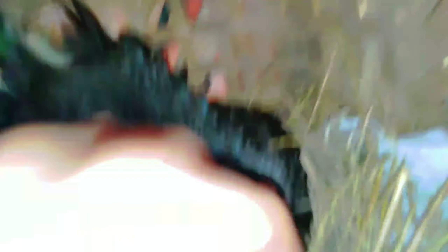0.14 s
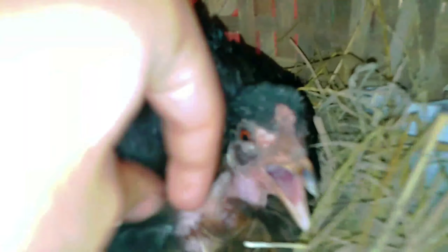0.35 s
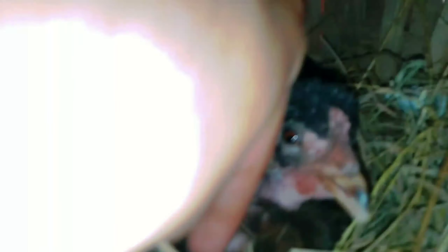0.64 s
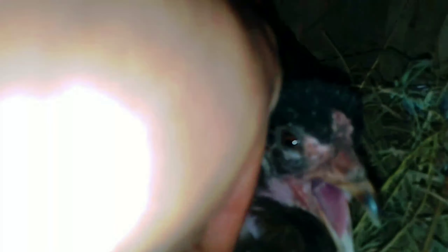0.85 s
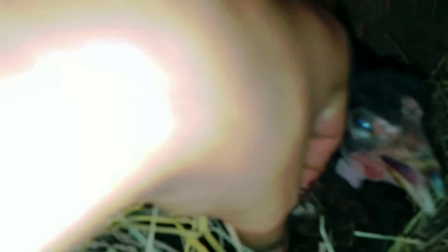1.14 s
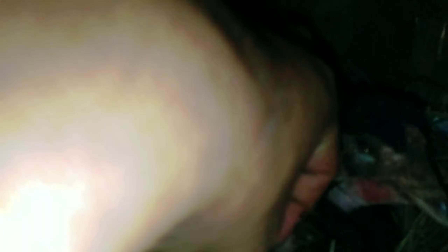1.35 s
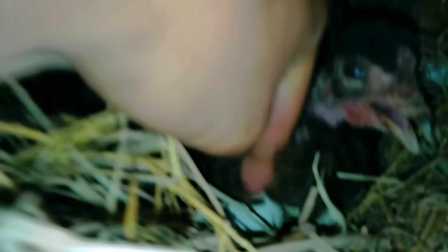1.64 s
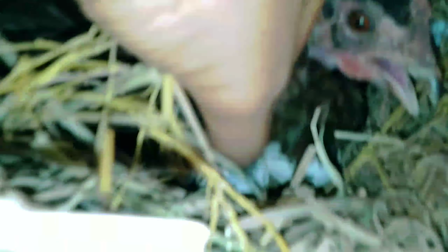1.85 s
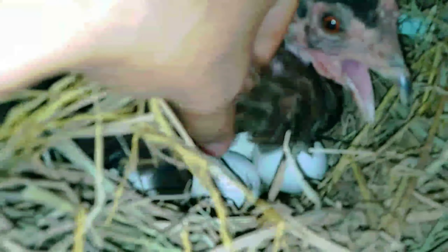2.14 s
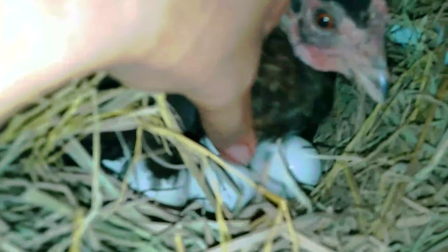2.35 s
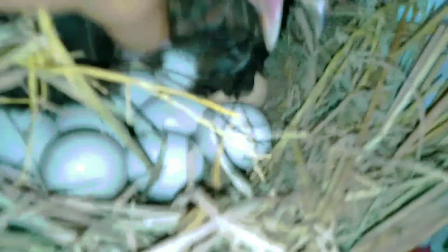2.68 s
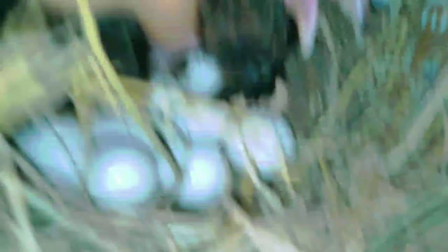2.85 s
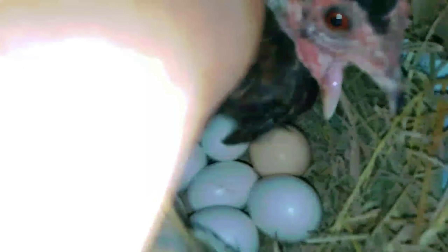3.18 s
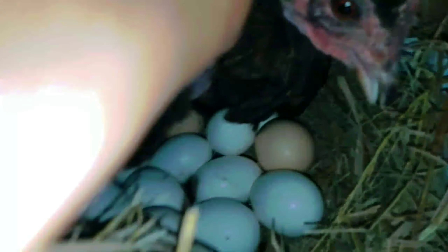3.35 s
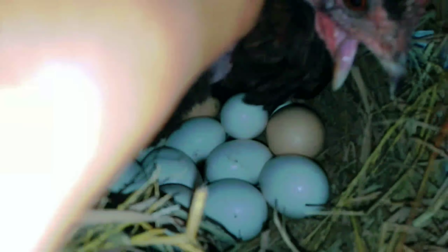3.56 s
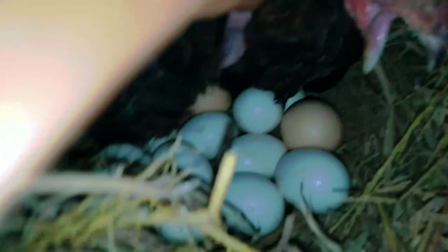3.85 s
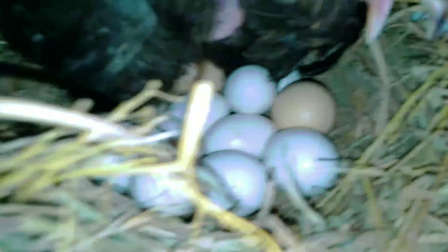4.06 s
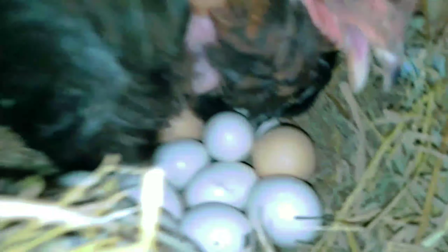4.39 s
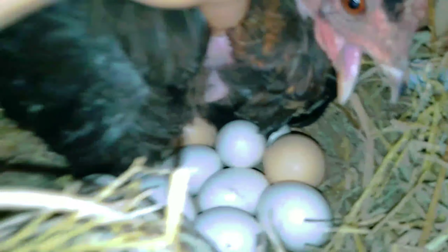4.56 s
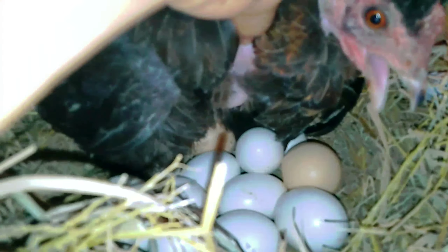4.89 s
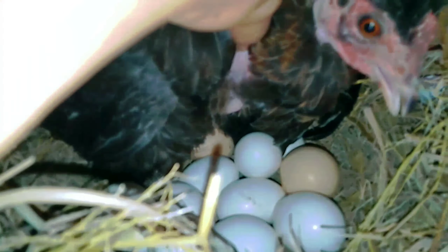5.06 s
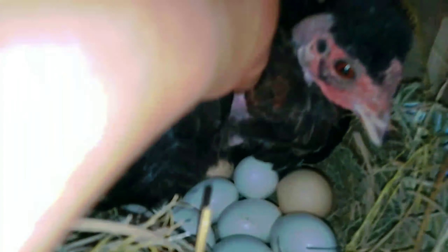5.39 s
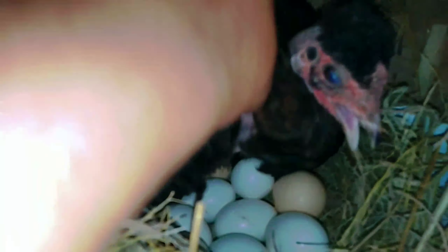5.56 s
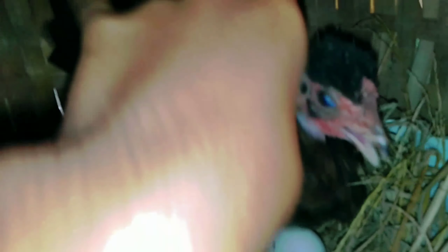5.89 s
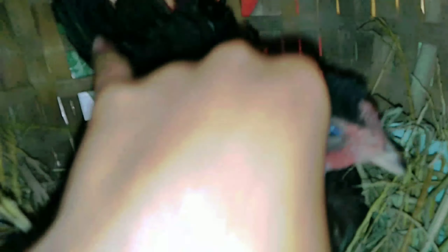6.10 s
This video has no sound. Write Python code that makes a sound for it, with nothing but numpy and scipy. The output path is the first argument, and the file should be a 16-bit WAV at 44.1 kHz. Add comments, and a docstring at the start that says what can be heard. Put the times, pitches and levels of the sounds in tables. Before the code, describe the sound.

Very close to the microphone, a brooding hen gives nine drawn-out squawks over about six seconds, breaking between nasal clear tone, flutter and harsh rasp. Tiny clucks fill some gaps. Faint chicks peep farther off in the first half, and two dry straw ticks snap. Behind lie a soft outdoor wash, low rumble and a short small-coop echo.

```python
"""A brooding hen protests, close to the microphone, as a hand lifts her off her eggs in a straw nest.
Membrane pulses and air pass through throat and beak resonances as clean tone, flutter and harsh rasp.
Chicks farther off in the yard peep as falling whistles; straw ticks are short decaying noise snaps.
The yard is coloured noise over a low rumble, and the small coop adds a short echo."""
import sys
import numpy as np
from scipy import signal
from scipy.fft import rfft, irfft
from scipy.io import wavfile
from scipy.ndimage import uniform_filter1d

SR = 44100
rng = np.random.default_rng(int(sys.argv[2]) if len(sys.argv) > 2 else 0)


def generate_wav(sig):
    """Save sig (samples, or channels by samples) to the path in sys.argv[1] as 16-bit PCM at SR."""
    pcm = np.round(np.clip(np.atleast_2d(sig).T, -1, 1) * 32767).astype(np.int16)
    wavfile.write(sys.argv[1], SR, pcm)


N = 274743

# the hen's long calls: start_s, end_s, first_beak_hz, last_beak_hz, upper_throat_hz,
# closing_pitch_fall (share), hiss_db, sizzle_db (above about 10 kHz)
LONG_CALLS = [(0.232, 0.6, 1980, 1880, 3560, 0.33, -1.5, -14),
              (0.771, 1.306, 1980, 1810, 3440, 0.21, -5, -14),
              (1.621, 2.358, 2052, 1947, 3023, 0.3, -4.5, -5.5),
              (2.719, 3.391, 2046, 1898, 3472, 0.27, -10, -0.5),
              (3.749, 3.915, 1560, 1524, 3430, 0.0076, -12, -8),
              (3.9, 4.21, 2190, 1940, 3457, 0.29, -3.5, 4),
              (4.267, 4.678, 1950, 2011, 3464, 0.042, 4.5, -2),
              (4.665, 5.505, 2053, 2051, 3647, 0.16, 1.5, 1.5), (5.492, 6.25, 1915, 1712, 3287, 0, -1, -5)]
# short clucks: centre_s, half_length_s, pitch_hz, roughness (0-1), level_db, brightness_db
SHORT_CLUCKS = [(0.044, .014, 345, 0.2, -34.5, -27), (0.193, 0.026, 438, 0.52, -30, -9),
                (2.657, .022, 505.4, 0.89, -28.5, -1.5), (3.551, .022, 441.4, .55, -30.5, -13.5),
                (3.641, 0.014, 534.4, 0.81, -28, -2)]
# harsh barks within a call, each a sudden shove of air:
# centre_s, half_length_s, level_db, upper_throat_db and hiss_db (both against that level)
AIR_SHOVES = [(0.398, 0.017, -43.5, 16.5, -14), (0.84, 0.013, -33.5, 1, -0.5),
              (1.051, .022, -22.5, 0.5, -14), (2.275, 0.0296, -39, 5, -24), (3.351, 0.01322, -26, 0.5, -27),
              (4.513, 0.0086, -37.5, 0.5, 1), (4.739, 0.0097, -22.5, -15, -6), (5.866, .022, -43.5, 9, 16)]
# treble as she turns her head to and from the microphone: time_s, level_db
HEAD_AIM = [(.45, -11.5), (.9, -11.5), (1.2, -11.5), (1.8, -8.5), (2.3, -16), (2.95, -21), (3.2, -1.5),
            (3.34, -3), (3.93, -1), (4.2, -8.5), (4.4, -23), (4.68, 1.5), (4.95, -1.5), (5.15, -17),
            (5.42, -16), (5.55, -5), (5.82, -7), (6.2, -22.5)]


def amp(db):
    """Decibels to a linear gain."""
    return 10 ** (np.asarray(db) / 20)


def unit(x):
    """Scales a sound to an RMS level of 1."""
    return x / np.sqrt(np.mean(x ** 2) + 1e-20)


def clock():
    """The time of every sample, in seconds."""
    return np.arange(N) / SR


def read(points, hz):
    """Reads a (Hz, value) table at any frequency, along a log frequency axis."""
    f, value = np.transpose(points)
    return np.interp(np.log(hz + 1), np.log(f + 1), value)


def follow(rows, t):
    """The columns of a table (s, ..) as curves over the times t."""
    s, *columns = np.transpose(rows)
    return [np.interp(t, s, c) for c in columns]


def colour(x, points):
    """Filters a sound by the response (Hz, dB)."""
    gain = amp(read(points, np.fft.rfftfreq(N, 1 / SR)))
    return irfft(rfft(x) * gain, N)


def wander(top_hz):
    """Random drift of RMS size 1, falling away steeply above top_hz."""
    hz = np.fft.rfftfreq(N, 1 / SR)
    spectrum = rfft(rng.standard_normal(N)) / np.sqrt(1 + (hz / top_hz) ** 4)
    return unit(irfft(spectrum, N))


def spell(start, end, fade):
    """1 between two times, with short ramps."""
    t = clock()
    return np.clip(np.minimum(t - start, end - t) / fade, 0, 1)


def bump(s, half, order=2):
    """A smooth swell of height 1 around the time s; a higher order gives steeper flanks."""
    return np.exp(-np.minimum(abs((clock() - s) / half) ** order, 50))


def steady(x, size=500):
    """Holds the short-time level at 1, keeping the fast grain."""
    power = uniform_filter1d(uniform_filter1d(x ** 2, size), size)
    return x / np.sqrt(abs(power) + 1e-12)


def add(mix, s, sound):
    """Lays a sound into the mix at the time s."""
    part = mix[round(s * SR):][:len(sound)]
    part += sound[:len(part)]


def resonate(x, hz, width):
    """A steep resonance of gain 1 that can follow a curve."""
    turn = np.exp(2j * np.pi * np.cumsum(hz * np.ones(N)) / SR)
    r = np.exp(-np.pi * width / SR)
    # shift the resonance down to 0 Hz, low-pass there, shift back
    smooth = signal.lfilter([(1 - r) ** 2], [1, -2 * r, r * r], x / turn + 1e-18)
    return 2 * (turn * smooth).real


def cavity(x, modes):
    """Several resonances side by side."""
    return sum(amp(db) * resonate(x, hz, width) for hz, width, db in modes)


def yard(rumble_swell_db=2):
    """A soft outdoor wash over a low, uneven rumble, both of coloured noise."""
    # colour of the wash: frequency_hz, relative_density_db
    wash_spectrum = [(180, -45), (300, -14.5), (1260, -7), (1540, -9.5), (1670, -7), (2140, -11.5),
                     (3130, -5.5), (5210, -22), (11300, -23), (15500, -34)]
    # wash over time: time_s, level_db
    wash_level = [(0, -44.5), (.65, -46.5), (1.452, -46.5), (2.5, -45.5), (3.2, -40), (3.452, -51.5),
                  (3.701, -42), (4.24, -48.5), (6.202, -37)]
    # colour of the rumble: frequency_hz, relative_density_db
    rumble_spectrum = [(12, -37), (20, -7.5), (75, 5.5), (137, 0.5), (259, -11), (300, -60), (390, -64),
                       (660, -120)]
    # rumble over time: time_s, level_db
    rumble_level = [(0, -52.5), (.8, -53.5), (1.2, -60.5), (1.6, -52), (2.2, -51), (3.6, -54), (4.2, -59.5),
                    (4.7, -52.5), (6.2, -54)]
    t = clock()
    wash_db = follow(wash_level, t)[0] + .8 * wander(14)
    wash = unit(colour(rng.standard_normal(N), wash_spectrum)) * amp(wash_db)
    swell = amp(rumble_swell_db * wander(7.5))
    rumble = unit(colour(rng.standard_normal(N), rumble_spectrum) * swell)
    return wash + amp(follow(rumble_level, t)[0]) * rumble


def gestures(rest_hz=541.5, stretch=0.14, closing_s=.045, clearing=0.706, cluck_rise=.08,
             bark_rough=0.493, beak_glide_s=0.089):
    """Pitch, roughness, beak and upper throat resonances; stretching the neck lifts both with pitch."""
    # one curve a call: time_s, pitch_hz, roughness (0-1)
    melodies = [
        [(.24, 602, 0.31), (.297, 689, 0.17), (.31, 594.4, 0.88), (.44, 541.7, 0.45), (.49, 594.6, 0.23),
         (.505, 514, 0.74), (.55, 538.7, 0.67), (.565, 751, 0.37)],
        [(.78, 550, 0.52), (.91, 550, 0.54), (1.056, 510.6, 0.51), (1.079, 651, 0.73), (1.274, 675.6, 0.83)],
        [(1.715, 679.6, 0.94), (1.744, 373.8, 0.34), (1.86, 463, .59), (1.95, 452.8, 0.46), (2.08, 410, 0.1),
         (2.15, 374, 0.29), (2.25, 477.7, 0.31), (2.291, 476, 0.71), (2.315, 664.7, 0.6)],
        [(2.72, 420, 0.41), (2.87, 492.6, 0.16), (3.06, 484.8, 0.33), (3.211, 486.5, 0.51), (3.245, 585.3, 0.6),
         (3.27, 540.6, 0.4), (3.3, 559.4, 0.14), (3.35, 513, 0.23)],
        [(3.79, 529, 0.26), (3.905, 513.5, 0.24)],
        [(3.905, 509, 0.24), (3.951, 555.6, .37), (4.02, 637.5, 0.2), (4.104, 566.7, 0.14), (4.125, 629, 0.69),
         (4.165, 707, 0.74)],
        [(4.3, 481, 0.77), (4.45, 503, 0.75), (4.6, 446.7, .45), (4.669, 482, .25)],
        [(4.715, 492, 0.22), (4.751, 625, 0.14), (4.795, 583.6, 0.14), (4.915, 563, 0.26), (4.999, 642.8, 0.25),
         (5.109, 602.4, 0.41), (5.14, 665, 0.57), (5.19, 682, 0.71), (5.204, 552, 0.13), (5.3, 564.6, 0.27),
         (5.345, 586, 0.18), (5.47, 532.3, 0.18)],
        [(5.53, 499.5, .3), (5.59, 446.4, 0.8), (5.72, 438.2, 0.46), (5.82, 484, 0.69), (5.95, 634.6, 0.65),
         (6.04, 619.5, 0.74), (6.119, 534.5, 0.82), (6.221, 474.4, 0.55)],
    ]
    t = clock()
    pitch, rough, beak_hz, upper_hz = np.outer([rest_hz, 0, *LONG_CALLS[0][3:5]], np.ones(N))
    for (start, end, beak_first, beak_last, upper, fall, _, _), melody in zip(LONG_CALLS, melodies):
        on = (t >= start) & (t <= end)
        hz, rasp = follow(melody, t[on])
        # as her air runs out the pitch falls, and after a marked fall the voice clears too
        closing = np.clip(1 - (end - t[on]) / closing_s, 0, 1)
        pitch[on] = hz * (1 - fall * closing ** 2)
        rough[on] = rasp * (1 - clearing * (fall > .1) * np.minimum(2 * closing, 1))
        beak_hz[on] = np.linspace(beak_first, beak_last, on.sum())
        upper_hz[on] = upper
    for s, half, hz, rasp, _, _ in SHORT_CLUCKS:
        on = abs(t - s) < 1.7 * half
        pitch[on] = hz * (1 + cluck_rise * (t[on] - s) / half)
        rough[on] = rasp
    for s, half, *_ in AIR_SHOVES:
        rough = rough + (1 - rough) * bark_rough * bump(s, half)  # part way to a full rasp
    neck = (pitch / rest_hz) ** stretch
    beak_hz = uniform_filter1d(beak_hz, round(beak_glide_s * SR))  # glides between calls
    return pitch, np.clip(rough, 0, 1), beak_hz * neck, upper_hz * neck


def syrinx(pitch, rough, jitter=.135, tremor=0.004366, shimmer_db=3.0, side_tones=0.68, count=30,
           rasp_air=.58, leak_air=.06, beak_air=.6):
    """Membrane pulses with a puff of air each cycle; returns voice, airier voice, sung pitch and throb."""
    # spells of flutter: start_s, end_s, beat_rate_hz, pitch_swing (share), level_swing_db
    flutter = [(0.374, 0.562, 53.3, 0.063, 1), (1.065, 1.298, 51.6, 0.035, -1.5),
               (1.772, 1.847, 49, 0.04, 1), (1.965, 2.05, 41.3, 0.067, 3.5), (2.079, 2.236, 54.5, 0.16, 5),
               (2.24, 2.34, 45, .13, 2.5), (2.786, 3.002, 41.6, 0.11, 6), (4.281, 4.6, 12.5, .05, -3),
               (4.929, 5.069, 37, 0.038, -2)]
    # spells of strong and weak membrane beats: start_s, end_s, cycles_per_group, depth
    grouping = [(3.064, 3.238, 3, 0.76), (3.772, 3.885, 2, .9), (3.913, 4.012, 2, 0.5),
                (4.116, 4.185, 2, 0.58), (4.861, 4.979, 2, 0.28), (4.299, 4.615, 3, 0.4),
                (5.051, 5.106, 3, 0.52), (5.583, 6.227, 3, 0.25)]
    t, bend, throb_db = clock(), np.zeros(N), np.zeros(N)
    for start, end, rate, swing, swing_db in flutter:
        beat = 2 * np.pi * rate * (t - start) + 2 * rough * wander(25.6)
        on = spell(start, end, 0.01105)
        bend += on * swing * np.cos(beat)
        throb_db -= on * swing_db * np.cos(beat)  # a positive swing is softest at the highest pitch
    sung = pitch * (1 + bend)
    unsteadiness = tremor + jitter * rough * np.sqrt(rough)
    turns = np.cumsum(sung * (1 + unsteadiness * wander(129.2))) / SR
    pulses = unit(sum(np.cos(2 * np.pi * k * turns) for k in range(1, count)))
    # in a rasp the second membrane beats at its own unsteady rate and throws broken side tones
    second = np.cumsum(pitch * (.5 + .13 * wander(45.65))) / SR
    shimmer = amp(shimmer_db * rough * wander(180))
    strength = shimmer * (1 + side_tones * rough * np.cos(2 * np.pi * second))
    for start, end, group, depth in grouping:
        on = spell(start, end, 0.0076)
        strength = strength * (1 + depth * on * np.cos(2 * np.pi * turns / round(group)))
    puffs = unit((0.81 + np.exp(-(turns % 1) / .5)) * rng.standard_normal(N))
    voice = strength * (pulses + (leak_air + rasp_air * rough) * puffs)
    airy = voice + beak_air * rough * strength * puffs
    return voice, airy, sung, amp(throb_db)


def sizzle(hiss):
    """The top of the hiss changes from call to call and as she turns her head."""
    t = clock()
    call_edges = np.ravel([call[:2] for call in LONG_CALLS])
    call_db = np.repeat([call[-1] for call in LONG_CALLS], 2)
    level_db = np.interp(t, call_edges, call_db) + 0.71 * follow(HEAD_AIM, t)[0]
    high_pass = signal.butter(3, 9800, "high", fs=SR, output="sos")
    top = signal.sosfiltfilt(high_pass, hiss)
    return hiss + (amp(level_db) - 1) * top


def throat(tuned_width_hz=260, tuned_db=3, third_db=-11, beak_width_hz=300, beak_skirt_db=-13,
           upper_width_hz=600, upper_skirt_db=-8, lurch_db=3, rasp_db=5):
    """The syrinx excites throat and beak; returns evened, then rasped and throbbing, low, beak, upper, hiss."""
    # the wide lower throat: frequency_hz, width_hz, gain_db
    low_modes = [(769.3, 88, 1), (1181, 445, -1), (1380, 290, -3.5)]
    # colour of the hiss: frequency_hz, gain_db
    hiss_spectrum = [(4300, -20), (4950, -6.5), (6000, -8.5), (7000, -2.5), (8100, 2.5), (9000, -5.5),
                     (10500, -3), (12000, 3), (13500, -0.5), (15500, -11)]
    pitch, rough, beak_hz, upper_hz = gestures()
    voice, airy, sung, throb = syrinx(pitch, rough)
    voice = signal.sosfilt(signal.butter(4, 590, "high", fs=SR, output="sos"), voice)
    # in clean notes the lowest resonance rides on the second harmonic and lifts the third
    second = resonate(voice, 2 * sung, tuned_width_hz)
    third = resonate(voice, 3 * sung, tuned_width_hz)
    tuned = second + amp(third_db) * third
    low = amp(tuned_db) * (1 - rough) * tuned + (0.15 + rough) * cavity(voice, low_modes)
    beak = resonate(voice, beak_hz, beak_width_hz) + amp(beak_skirt_db) * resonate(voice, 2052, 1060)
    upper_skirt = resonate(voice, 4130, 464) - resonate(voice, 2702, 222)
    upper = resonate(voice, upper_hz, upper_width_hz) + amp(upper_skirt_db) * upper_skirt
    hiss = colour(airy, hiss_spectrum) * amp(rasp_db * rough * wander(73))  # spits when she rasps
    # a rasp throws its energy unevenly from one resonance to another
    bands = (low, beak, upper, sizzle(hiss))
    return [steady(x) * amp(lurch_db * rough * wander(53)) * throb for x in bands]


def clucks(low, beak, upper, hiss, hiss_per_brightness=2.77):
    """Short steep-sided swells of voice; a brighter one opens beak, upper throat and hiss."""
    out = np.zeros(N)
    for s, half, _, _, db, bright in SHORT_CLUCKS:
        call = low + amp(bright) * (beak + upper) + amp(hiss_per_brightness * bright) * hiss
        out += amp(db) * bump(s, half, order=4) * call
    return out


def squawks(low, beak, upper, hiss, beak_db=-.5, upper_db=-1, drain=0.56, attack_s=.012,
            release_s=0.021, full_cry_db=-24, hiss_per_opening=0.76):
    """Opening the beak drains the lower throat into its resonance; effort and aim bring out the treble."""
    # one curve a call: time_s, effort_db, beak_opening_db (share of the beak resonance)
    effort_curves = [
        [(0.23, -45, -12), (0.286, -43, -35), (0.304, -33, -12), (0.398, -22.5, -16), (0.432, -17, -6.5),
         (0.476, -26, -5.5), (0.488, -16, -27), (0.506, -20.5, 2), (0.59, -18.5, -5.5)],
        [(0.785, -28.5, 0.5), (0.837, -29, -8), (0.895, -32.5, -2), (1.067, -23.5, -5.5), (1.079, -25.5, 1),
         (1.245, -24, 1.5), (1.277, -19, -5.5), (1.295, -21.5, -2.5)],
        [(1.635, -27, -0.5), (1.715, -23, -2.5), (1.745, -27, -20.5), (1.853, -21, -1.5), (2.021, -24.5, -3.5),
         (2.121, -29, -20.5), (2.237, -20, -0.5), (2.309, -19.5, -3), (2.345, -22.5, -0.5)],
        [(2.73, -44.5, -2), (2.824, -32.5, -12.5), (2.932, -36.5, -6), (3.01, -35, -14), (3.218, -32, -11),
         (3.252, -15.5, -16), (3.266, -23, -6.5), (3.364, -27, 3.5), (3.38, -33.5, -3)],
        [(3.755, -31, 2), (3.833, -23, 1), (3.905, -26, 2)],
        [(3.91, -32, -1), (3.936, -22, -1.5), (4.116, -24.5, -6), (4.158, -22.5, 1.5), (4.195, -24, 0.5)],
        [(4.28, -38, -9), (4.362, -40.5, -9), (4.522, -31.5, -4.5), (4.566, -36, -7.5), (4.67, -34, 0.5)],
        [(4.68, -31.5, -3.5), (4.71, -32, -4.5), (4.734, -29, -1), (4.752, -22, -9), (4.79, -26.5, -2.5),
         (4.946, -22, -6), (5.116, -24.5, -2.5), (5.356, -27.5, -1), (5.396, -22, -5), (5.47, -27, -3),
         (5.49, -23, -16)],
        [(5.51, -32.5, 1.5), (5.57, -36, -1.5), (5.598, -28, -1.5), (5.742, -25, -4.5), (6.052, -19.5, 0),
         (6.22, -26, -14)],
    ]
    t, out = clock(), np.zeros(N)
    for (start, end, *_, hiss_db, _), curve in zip(LONG_CALLS, effort_curves):
        on = (t >= start) & (t <= end)
        effort, opening = follow(curve, t[on])
        aim = follow(HEAD_AIM, t[on])[0]
        gate = np.clip(np.minimum((t[on] - start) / attack_s, (end - t[on]) / release_s), 0, 1)
        kept = np.sqrt(np.clip(1 - drain * amp(opening) ** 2, .04, 1))
        # the call's own hiss level holds at a full cry with opening and aim at 0 dB
        breath_db = hiss_db + (effort - full_cry_db) + hiss_per_opening * opening + aim
        call = kept * low[on] + amp(beak_db + opening) * beak[on]
        call += amp(upper_db + aim) * upper[on] + amp(breath_db) * hiss[on]
        out[on] += gate * amp(effort) * call
    return out


def barks(low, beak, upper, hiss, body_db=2):
    """Sudden shoves of air swell the throat and beak resonances and the hiss together."""
    out = np.zeros(N)
    for s, half, db, upper_db, hiss_db in AIR_SHOVES:
        call = amp(upper_db) * upper + amp(hiss_db) * hiss + amp(body_db) * (low + beak) / 2
        out += amp(db) * bump(s, half) * call
    return out


def hen():
    """Short clucks, long squawks and barks all come from the one throat."""
    bands = throat()
    return clucks(*bands) + squawks(*bands) + barks(*bands)


def nest(x):
    """Close surfaces ripple the spectrum, so gliding harmonics swell and fade."""
    # first reflections from hand, nest and walls: delay_s, gain (linear)
    near_walls = [(.00102, 0.071), (.0027, 0.011)]
    hz = np.fft.rfftfreq(N, 1 / SR)
    reflected = sum(gain * np.exp(-2j * np.pi * hz * delay) for delay, gain in near_walls)
    return irfft(rfft(x) * (1 + reflected), N)


def chicks(peep_s=0.0458, peep_fall=0.13, waver=0.0093):
    """Each peep is a short falling whistle; one lower note has no such fall, only the slight waver."""
    # peeps: start_s, first_pitch_hz, level_db
    peeps = [(.22, 3450, -47), (.725, 3350, -46), (1.365, 3900, -47), (1.41, 3380, -48), (2.397, 3500, -45),
             (2.47, 3650, -48), (2.545, 3280, -49), (2.702, 3620, -45), (2.81, 3570, -45),
             (3.02, 4100, -47), (3.055, 3420, -44)]
    # the lower note: start_s, pitch_hz, level_db
    low_whistle = (2.925, 1765, -43)
    out, drift, size = np.zeros(N), 1 + waver * wander(110), round(peep_s * SR)
    swell = signal.windows.tukey(size, .7)
    for (s, first_hz, db), fall in [(peep, peep_fall) for peep in peeps] + [(low_whistle, 0)]:
        hz = first_hz * np.geomspace(1, 1 - fall, size) * drift[round(s * SR):][:size]
        whistle = np.sqrt(2) * np.sin(2 * np.pi * np.cumsum(hz) / SR)
        add(out, s, amp(db) * whistle * swell)
    return out


def straw(decay_s=0.0018):
    """Dry stalks snap under the hand: bright noise that dies away at once."""
    # snapping stalks: time_s, peak_db
    ticks = [(2.122, -33), (2.888, -32)]
    out, t = np.zeros(N), np.arange(600) / SR
    for s, db in ticks:
        snap = np.diff(rng.standard_normal(len(t) + 1)) * np.exp(-t / decay_s)
        add(out, s, amp(db) * snap / abs(snap).max())
    return out


def coop(x):
    """Dense weak reflections, each band dying at its own speed."""
    # decay of the echo: frequency_hz, t60_s
    decay_times = [(200, 0.21), (1000, 0.14), (3500, 0.069), (8000, 0.033), (15000, 0.011)]
    taps = rng.standard_normal(SR // 2) * (np.arange(SR // 2) > 130)  # silent for the first 3 ms
    hz, t, z = signal.stft(taps, SR, nperseg=256)
    decay = amp(-60 * t / read(decay_times, hz)[:, None])
    tail = signal.istft(z * decay, SR, nperseg=256)[1]
    return signal.fftconvolve(x, tail / np.linalg.norm(tail))[:N]


def scene(near_echo_db=-23, far_echo_db=-6):
    """The hen and straw are near the microphone and dry, the chicks farther off with more echo."""
    background = yard()
    near = nest(hen())
    far = chicks()
    near = near + straw()
    echo = coop(amp(near_echo_db) * near + amp(far_echo_db) * far)
    return (near + far + echo + background)[None]


def record(dry, ceiling=.42, edge_hz=15600):
    """The loudest peaks are rounded off below the ceiling; then a low-pass limits the band."""
    rounded = dry / (1 + (dry / ceiling) ** 6) ** (1 / 6)
    low_pass = signal.firwin(511, edge_hz, window=("kaiser", 9), fs=SR)
    return signal.oaconvolve(rounded, low_pass[None], "same")


dry = scene()
out = record(dry)
generate_wav(out)
```